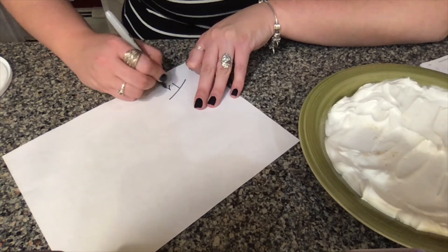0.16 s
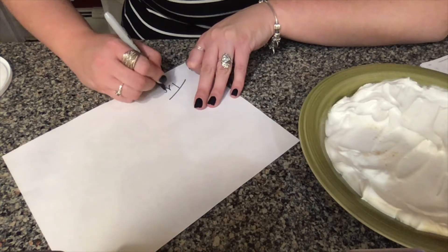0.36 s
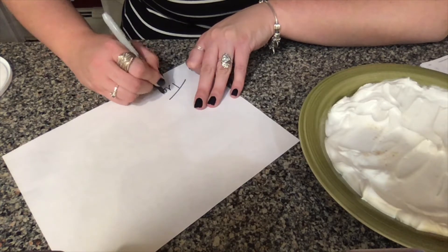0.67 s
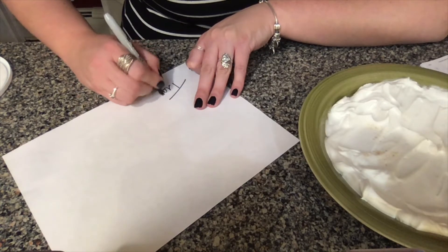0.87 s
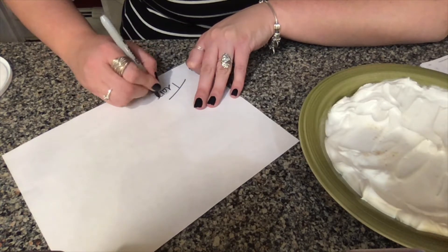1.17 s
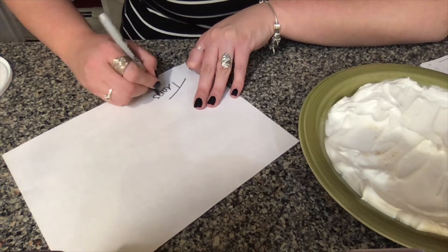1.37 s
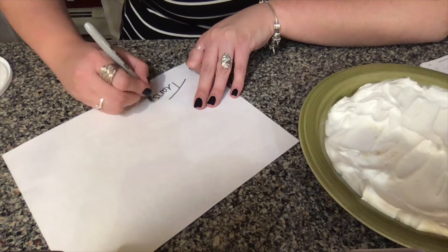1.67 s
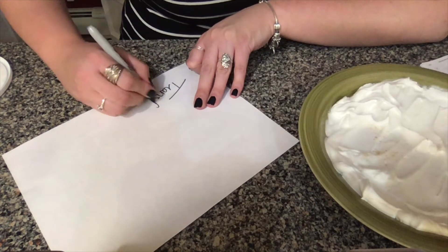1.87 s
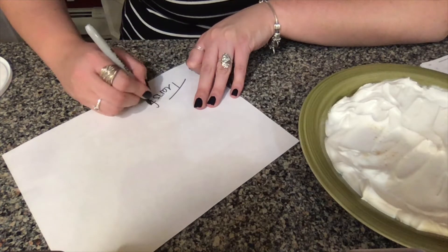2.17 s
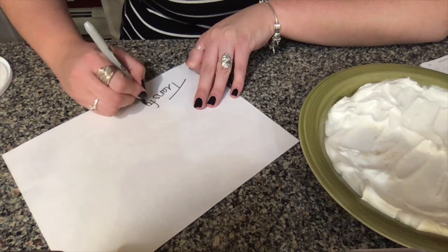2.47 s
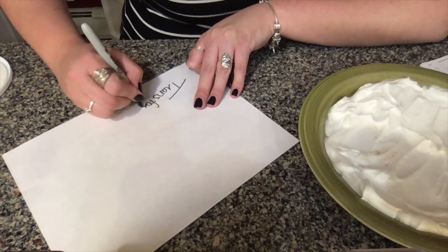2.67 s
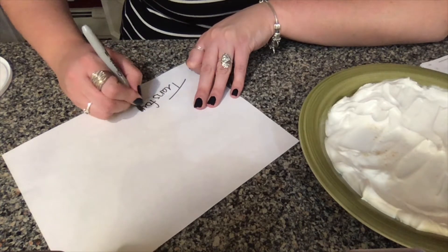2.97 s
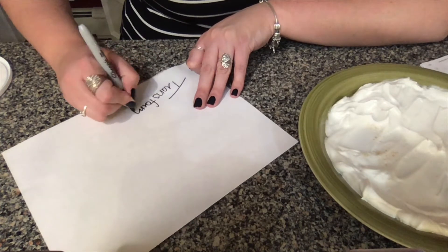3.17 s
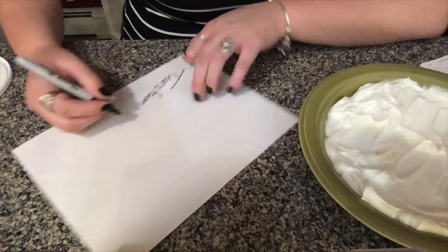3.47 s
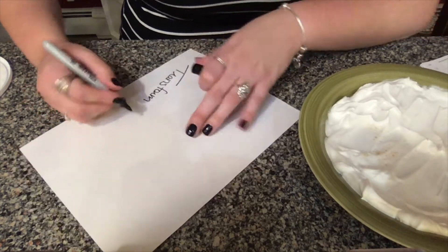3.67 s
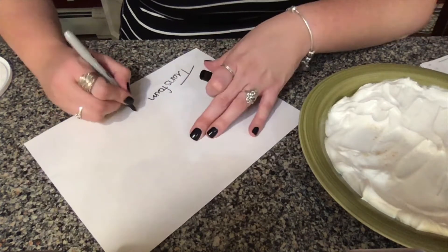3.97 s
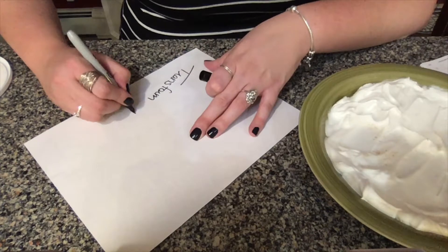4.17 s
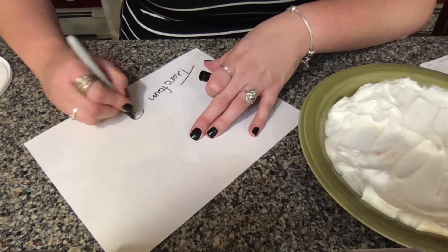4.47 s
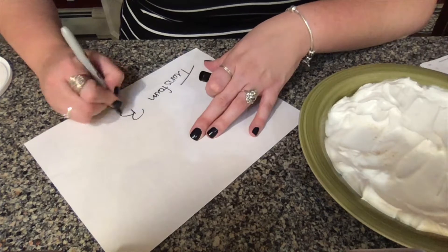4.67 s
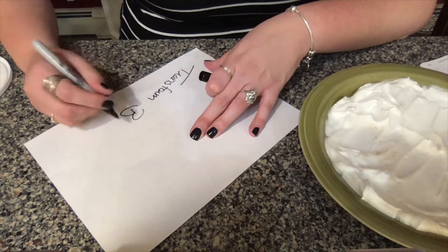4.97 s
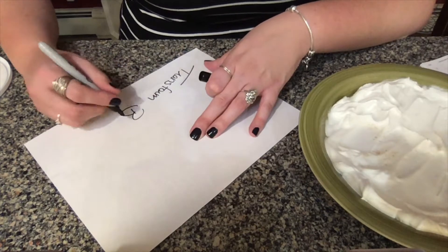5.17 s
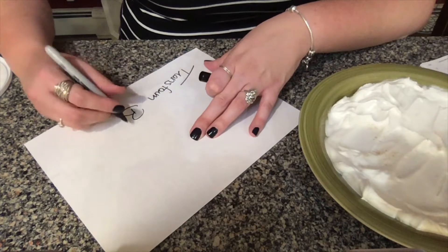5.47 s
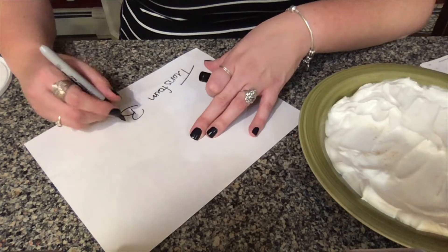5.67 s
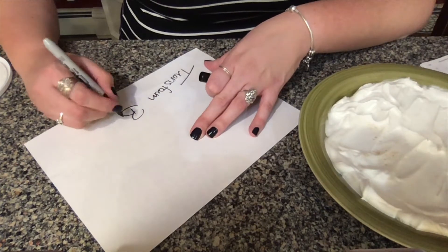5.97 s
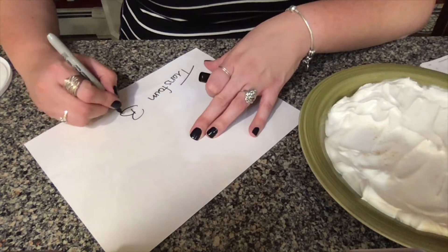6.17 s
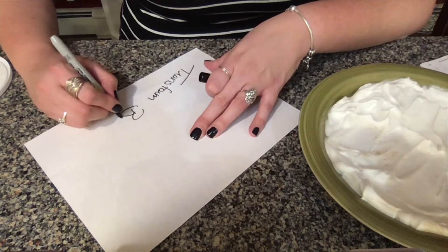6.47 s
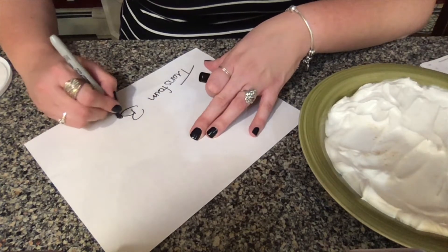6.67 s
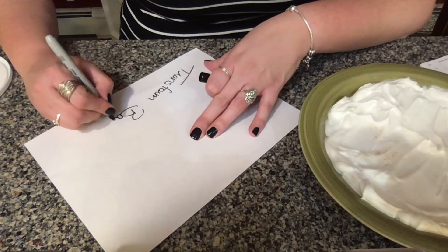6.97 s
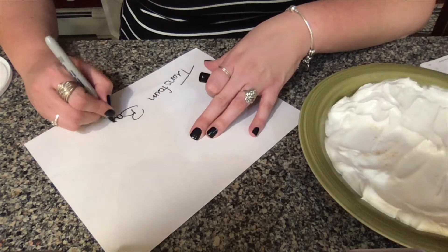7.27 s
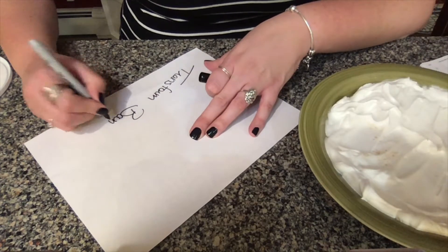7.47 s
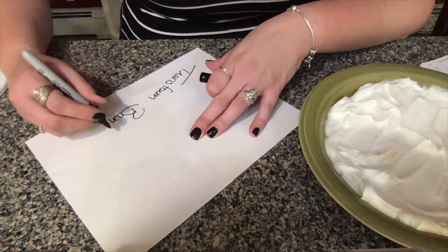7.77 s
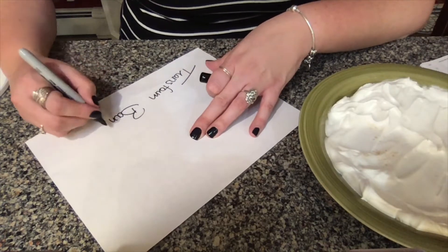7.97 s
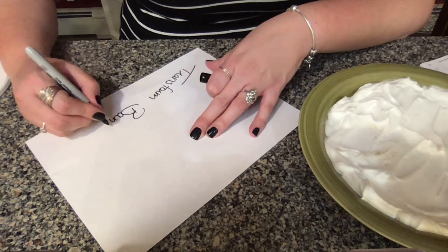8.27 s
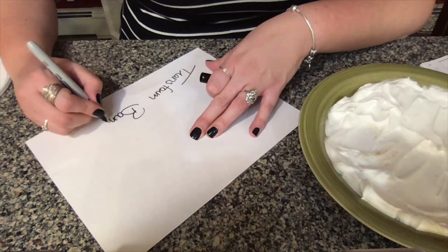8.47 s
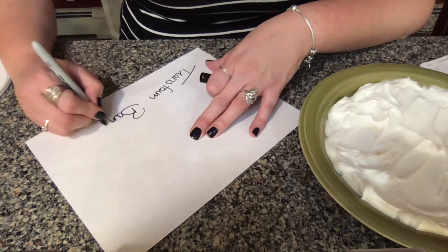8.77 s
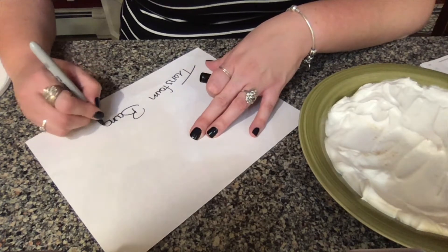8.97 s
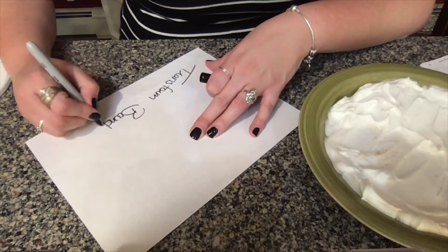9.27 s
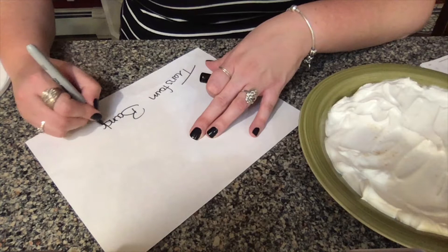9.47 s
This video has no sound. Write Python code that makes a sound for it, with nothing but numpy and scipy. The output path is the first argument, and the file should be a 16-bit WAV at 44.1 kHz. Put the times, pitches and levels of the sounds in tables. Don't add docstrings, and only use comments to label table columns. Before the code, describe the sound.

In a small kitchen, a felt-tip marker writes on paper lying on stone. Quick dry scratches come in clusters, then the sheet slides and is pressed flat with a small knock. Firmer strokes follow, a pause with light ticks, then more gentle writing with gaps. A low refrigerator hum and faint hiss run throughout, caught by a close phone microphone.

```python
import sys
import numpy as np
from scipy import signal
from scipy.fft import rfft, irfft, next_fast_len
from scipy.io import wavfile

SR = 44100
rng = np.random.default_rng(int(sys.argv[2]) if len(sys.argv) > 2 else 0)


def dump_mix(stems):
    frames = np.atleast_2d(stems).T
    limited = np.clip(frames, -1, 1)
    pcm = np.round(limited * 32767).astype(np.int16)
    wavfile.write(sys.argv[1], SR, pcm)


def magnitude_from_level(level_db):
    exponent = np.asarray(level_db, float) / 20
    return 10 ** exponent


N = 424241
STEP = 40


def rms_one(x):
    return x / np.sqrt(np.mean(x ** 2) + 1e-20)


def noise_pair():
    return rng.standard_normal((2, N))


def to_samples(control):
    return np.interp(np.arange(N) / STEP, np.arange(len(control)), control)


def flutter(depth_db, rate_hz):
    r = np.exp(-2 * np.pi * rate_hz * STEP / SR)
    settle = 2000
    slow = signal.lfilter([1], [1, -2 * r, r * r], rng.standard_normal(N // STEP + settle + 2))[settle:]
    return to_samples(magnitude_from_level(depth_db * rms_one(slow)))


def resonate(x, hz, width_hz):
    r = np.exp(-np.pi * width_hz / SR)
    b = np.array([1, 0, -1]) * (1 - r * r) / 2
    return signal.lfilter(b, [1, -2 * r * np.cos(2 * np.pi * hz / SR), r * r], x)


def coloured(sources, spectrum, patchy_db, flicker_hz):
    hz, level_db = np.transpose(spectrum)
    edges = np.geomspace(hz[0], hz[-1], round(4 * np.log2(hz[-1] / hz[0])))
    out = 0
    for k, (low, high) in enumerate(zip(edges, edges[1:])):
        sos = signal.butter(2, [low, high], "band", fs=SR, output="sos")
        band = signal.sosfilt(sos, sources[k % 2])
        band_db = np.interp(np.log(low * high) / 2, np.log(hz), level_db)
        out = out + band * magnitude_from_level(band_db) * flutter(patchy_db, flicker_hz)
    return rms_one(out)


def shaped(x, spectrum):
    size = next_fast_len(N)
    hz, level_db = np.transpose(spectrum)
    bin_hz = np.arange(size // 2 + 1) * SR / size + 1
    gain = magnitude_from_level(np.interp(np.log(bin_hz), np.log(hz), level_db))
    return rms_one(irfft(rfft(x, size) * gain, size)[:N])


def clicks(events, level_db):
    out = np.full(N, 1e-18)
    out[[round(row[0] * SR) for row in events]] = magnitude_from_level(level_db)
    return out


def decay(x, time_s):
    return signal.lfilter([1], [1, -np.exp(-1 / (time_s * SR))], x)


def pushes(rows, extra_db, spread):
    rise_power, fall_power = 2.08, 2.04
    top_s, rise_s, fall_s, level_db = np.array(rows).T[:4, :, None]
    away_s = np.arange(0, N + STEP, STEP) / SR - top_s
    rising = np.abs(away_s / rise_s) ** rise_power
    falling = np.abs(away_s / fall_s / spread) ** fall_power
    away = np.where(away_s < 0, rising, falling)
    power = magnitude_from_level(2 * (level_db + np.reshape(extra_db, (-1, 1)) - 20 * away)).sum(axis=0)
    return to_samples(np.sqrt(power))


# f/Hz, level per Hz/dB
AIR_SPECTRUM = [(180, -9.5), (300, 0), (420, -4.5), (540, -6), (680, -6), (1000, -10), (1500, -15),
                (2100, -21), (2600, -35), (4000, -41), (6300, -43.5), (8200, -41), (11200, -57),
                (14500, -38.5), (15900, -38)]


def air():
    return magnitude_from_level(-56) * flutter(0.3, 1.2) * coloured(noise_pair(), AIR_SPECTRUM, 0.6, 5.0)


# multiple of hum, level re hum/dB
HUM_OVERTONES = [(1.5, -25), (2.0, -29), (4.0, -44)]
# f/Hz, level per Hz/dB
RUMBLE_SPECTRUM = [(15, 5.5), (28, 0), (42, -1.5), (54, -12.5), (70, -4), (100, -6), (150, -15),
                   (200, -22.5), (280, -29.5), (400, -37)]


def fridge():
    hum_hz, hum_db, rumble_db = 119.9, -33.5, -36.5
    motor_hz, motor_width_hz, motor_db = 663, 42, -68
    phase = 2 * np.pi * hum_hz * np.arange(N) / SR
    tone = np.sin(phase)
    for multiple, db in HUM_OVERTONES:
        wander_rad = 0.73 * np.log(flutter(3.9, 4.0))
        tone = tone + magnitude_from_level(db) * flutter(2.7, 7.7) * np.sin(multiple * phase + wander_rad)
    hum = np.sqrt(2) * magnitude_from_level(hum_db) * flutter(0.75, 5.3) * tone
    white = noise_pair()
    drone = resonate(resonate(white[0], motor_hz, motor_width_hz), motor_hz, motor_width_hz)
    rumble = coloured(white, RUMBLE_SPECTRUM, 1.0, 0.53)
    return hum + magnitude_from_level(rumble_db) * rumble + magnitude_from_level(motor_db) * rms_one(drone)


def kitchen(x):
    t60_s, wall_cut_hz = 0.45, 6000
    size = next_fast_len(N + SR)
    z = np.exp(-2j * np.pi * np.arange(size // 2 + 1) / size)
    dull = np.exp(-2 * np.pi * wall_cut_hz / SR)
    wall = (1 - dull) / (1 - dull * z)
    echo = 0
    for k, lag in enumerate((rng.uniform(0.008, 0.03, 10) * SR).astype(int)):
        loop = magnitude_from_level(-60 * lag / SR / t60_s) * wall * np.exp(lag * np.log(z))
        echo = echo + (-1) ** k * loop / (1 - loop)
    return irfft(rfft(x, size) * echo, size)[:N]


# t of top speed/s, rise/s, fall/s, level/dB
HAND_DRAGS = [
    (.55, .2, 0.4, -60),
    (2.3, 0.051, 0.19, -60),
    (3.46, 0.088, 0.11, -58.5),
    (3.79, 0.087, 0.086, -60),
    (5.47, 0.04, 0.086, -52.5),
]
# f/Hz, level per Hz/dB
SKIN_SPECTRUM = [(450, -9), (700, 4), (1100, 2), (1500, -15.5), (2300, -13.5)]


def hand():
    return pushes(HAND_DRAGS, 0, 1) * coloured(noise_pair(), SKIN_SPECTRUM, 2.0, 12.0)


# t/s, peak level/dB, brightness/dB
SMALL_KNOCKS = [(1.0126, -55, -19), (2.2464, -57.5, 0), (3.7464, -50.5, -17), (3.7808, -45, -8),
                (6.6508, -53, -10), (7.251, -51, -18), (8.8253, -48, -10), (3.0655, -40, -16),
                (4.5955, -46, -26), (5.997, -49, -12), (6.0088, -37.5, -15), (6.1085, -45, -22)]
# f/Hz, width/Hz, level/dB
KNOCK_MODES = [(1400, 260, -5), (1750, 260, -7), (2200, 300, -12), (3000, 400, -17), (4100, 500, -25),
               (5400, 300, -33), (7800, 600, -29), (9100, 600, -30)]


def ticks():
    _, peak_db, bright_db = np.array(SMALL_KNOCKS).T
    scuff = rng.standard_normal(N)
    out = np.zeros(N)
    for hz, width_hz, db in KNOCK_MODES:
        knock = clicks(SMALL_KNOCKS, peak_db + db + (bright_db + 18) * (hz > 4500))
        burst = knock * SR / (np.pi * width_hz) + magnitude_from_level(19.5) * scuff * decay(knock, 0.0019)
        ring = resonate(burst, hz, width_hz)
        ring = resonate(ring, hz, 2 * width_hz)
        out += resonate(ring, hz, 2 * width_hz)
    return out


def fibre_slips():
    slips_per_s = 14000
    hits = rng.random((2, N)) < slips_per_s / SR
    size = magnitude_from_level(1.49 * rng.exponential(1, (2, N)))
    slips = hits * size * rng.choice([-1, 1], (2, N))
    return slips + 0.99 * noise_pair()


def sheet(slips):
    out = 0
    for k, hz in enumerate(np.linspace(1500, 16500, 76)):
        out = out + flutter(3.1, 7.0) * resonate(slips[k % 2], hz, 190) * (-1) ** (k // 2)
    return out


# f/Hz, level per Hz/dB
SHEET_SPECTRUM = [(4000, -37.5), (5200, -14), (5800, -6.5), (6400, -5), (7400, -3), (8300, 0), (9300, -5.5),
                  (10200, -8), (10900, -18), (11800, -34.5)]
# f/Hz, level per Hz/dB
FIBRE_SPECTRUM = [(10000, -50), (11000, -24), (12000, -13.5), (13000, -8.5), (14000, -4), (14700, -3.5),
                  (15300, -8.5), (15750, -1.5), (16000, -39)]
# f/Hz, level per Hz/dB
COUNTER_SPECTRUM = [(1700, -31), (2100, -2), (2700, -0.5), (3200, 3.5), (3700, 2), (4500, 0.5),
                    (5200, -2.5), (6200, -36)]


def paper_noises(slips):
    paper = sheet(slips)
    return [shaped(paper, spectrum) for spectrum in (SHEET_SPECTRUM, FIBRE_SPECTRUM, COUNTER_SPECTRUM)]


# f/Hz, width/Hz, level/dB
TIP_RINGS = [(3684, 54, -2.5), (4400, 350, -4), (7240, 200, -5.5), (8130, 36, -16.5), (8690, 27, -12.5),
             (14600, 300, -6), (15300, 300, -6)]


def tip_rings(hiss):
    return sum(magnitude_from_level(db) * flutter(1.1, 13.0) * resonate(hiss, hz, width_hz) for hz, width_hz, db in TIP_RINGS)


# f/Hz, width/Hz, level/dB
BARREL_MODES = [(1462, 350, -0.5), (1628, 180, 1), (1748, 140, -4)]


def barrel(slips):
    out = 0
    for hz, width_hz, db in BARREL_MODES:
        ring = resonate(resonate(slips[0], hz, width_hz), hz, width_hz)
        out = out + magnitude_from_level(db) * flutter(1.8, 9.0) * ring
    return rms_one(out)


# t of top/s, rise/s, fall/s, level/dB
TURN_DIGS = [(.3, .01, 0.056, -64), (.89, .01, 0.041, -70), (1.325, .015, 0.057, -55),
             (4.556, .02, .03, -60), (4.598, 0.0066, 0.06, -57), (4.72, .03, 0.11, -63),
             (6.6, .06, 0.18, -66), (6.95, 0.12, 0.18, -67), (8.83, .015, .06, -64.5),
             (9.09, 0.032, 0.05, -63), (9.385, 0.011, .08, -67)]


def barrel_pressure(rows, effort_db, lean_db):
    base_db, effort_lag, lean_share, spread = -1.5, 0.65, 1.3, 1.2
    push_db = base_db - effort_lag * effort_db + lean_share * lean_db
    return pushes(rows, push_db, spread) + pushes(TURN_DIGS, 0, 0.75)


# t/s, peak level/dB
TIP_TOUCHES = [(0.2721, -60), (0.8235, -67), (0.856, -59), (1.1453, -64), (2.0596, -60), (2.8975, -65.5),
               (3.0689, -55.5), (3.761, -50), (3.782, -42), (3.796, -43), (4.384, -53), (4.589, -63),
               (6.441, -44.5), (6.4628, -55), (7.1846, -67.5), (7.251, -52), (8.7889, -47), (9.3367, -55)]


def landings(body, top):
    touches = clicks(TIP_TOUCHES, np.array(TIP_TOUCHES)[:, 1] - 15)
    return decay(touches, 0.0058) * (body + magnitude_from_level(-9.0) * top)


# t of top speed/s, rise/s, fall/s, rubbing level/dB, fibre hiss re rubbing/dB
FIRST_PUSHES = [(0.017, 0.026, 0.063, -59.7, -17), (0.047, 0.069, 0.06, -63, 4),
                (0.136, 0.043, 0.072, -67.5, -3), (0.181, 0.011, 0.064, -72.0, 7),
                (0.279, 0.0093, 0.44, -73, 7.5), (0.346, 0.019, 0.073, -67.5, -7),
                (0.477, 0.084, 0.031, -62, -2.3), (0.547, 0.057, 0.14, -74.5, 2),
                (0.756, 0.054, 0.048, -71.1, 2.4), (0.827, 0.0077, 0.2, -70.5, 5),
                (0.931, 0.1, 0.068, -63, 3), (1.055, 0.15, 0.023, -81, 9), (1.151, 0.019, 0.06, -72.5, 8),
                (1.234, 0.037, 0.11, -68.5, 5.0), (1.321, 0.03, 0.078, -54.5, 0.5),
                (1.415, 0.031, 0.11, -75, 6)]
NEXT_PUSHES = [(1.798, 0.032, 0.13, -69, -0.8), (1.884, 0.077, 0.07, -62, -2), (1.964, 0.01, 0.067, -74, 8),
               (2.093, 0.042, 0.053, -65, 2), (2.193, 0.018, 0.468, -70, -1.3),
               (2.308, 0.07, 0.16, -57.0, -1.5), (2.533, 0.257, 0.03, -67.5, 0),
               (2.662, 0.17, 0.043, -71.5, 4), (2.82, 0.05, 0.052, -76, 2), (2.901, 0.016, 0.12, -63.5, -1),
               (2.994, 0.03, 0.056, -64.5, 1), (3.076, 0.019, 0.15, -58.0, -3.3),
               (3.146, 0.018, 0.083, -61, -2)]
SHEET_SLIDE = [
    (3.316, 0.36, 0.23, -73, -1.7),
    (3.435, 0.06, 0.18, -58.5, 6.5),
    (3.716, 0.062, 0.73, -80, 3),
    (3.777, 0.0051, 0.11, -72.5, 5),
]
CAPITAL_PUSHES = [
    (4.19, 0.017, 0.12, -70.5, 0.1),
    (4.271, 0.006, 0.34, -85, 10),
    (4.383, 0.0074, 0.6, -67, 4),
    (4.459, 0.08, 0.025, -62, 6),
    (4.544, 0.085, 0.03, -58, 1),
    (4.59, 0.0049, 0.11, -59, 2.5),
    (4.727, 0.06, 0.084, -51.5, 7),
    (4.815, 0.06, 0.29, -78.5, 0.5),
    (5.339, 0.038, 0.024, -81.5, 8),
]
LAST_PUSHES = [(6.438, 0.005, 0.057, -79, 9), (6.517, 0.015, 0.19, -68.2, 0), (6.622, 0.057, 0.071, -80, 6),
               (6.658, 0.17, 0.08, -62, 2), (6.894, 0.059, 0.27, -70, -4), (6.979, 0.052, 0.079, -60.5, 2),
               (7.182, 0.04, 0.05, -71, 0.5), (7.253, 0.012, 0.2, -67, 0),
               (7.347, 0.031, 0.064, -65.5, 0.5), (8.787, 0.012, 0.07, -65.5, 3),
               (8.833, 0.025, 0.11, -63, -1), (8.919, 0.056, 0.12, -62, 1), (9.052, 0.184, 0.039, -78, -5),
               (9.127, 0.094, 0.087, -69.2, -2.3), (9.337, 0.015, 0.042, -75, 8),
               (9.42, 0.081, 0.09, -67, -1.9), (9.515, 0.066, 0.085, -64, 1), (9.616, 0.022, 0.02, -68, -3)]
LIGHT_GRAZES = [
    (1.57, 0.042, 0.067, -86, 6),
    (1.65, .03, 0.043, -92, 6),
    (5.2, 0.18, 0.13, -84.5, 1),
    (5.7, 0.018, .04, -86, 2),
    (6.015, 0.025, .12, -80, -11),
    (7.73, 0.073, .12, -103, 20),
]
# t/s, level/dB
PEN_LEAN = [(0, -5), (.3, 1.5), (.9, 1), (1.3, -0.5), (1.9, -0.5), (2.3, 2.5), (3.1, -0.5), (3.44, -4.5),
            (3.8, 7), (4.45, -2.5), (4.62, 1), (4.75, -1), (6.45, 3), (6.6, 1), (7.3, 0.5), (8.79, -5),
            (8.9, 1.5), (9.62, 0)]


def marker():
    usual_rub_db = -65
    rows = np.vstack([FIRST_PUSHES, NEXT_PUSHES, SHEET_SLIDE, CAPITAL_PUSHES, LAST_PUSHES])
    light = np.vstack([rows, LIGHT_GRAZES])
    effort_db, bright_db = rows[:, 3] - usual_rub_db, rows[:, 4]
    lean_db = np.interp(rows[:, 0], *np.transpose(PEN_LEAN))

    rub = pushes(light, 0, 0.93)
    fibres = pushes(light, light[:, 4], 0.8)
    weight = pushes(rows, -5 - 0.46 * effort_db - 0.51 * bright_db + lean_db, 1.17)
    pressure = barrel_pressure(rows, effort_db, lean_db)

    slips = fibre_slips()
    body, top, counter = paper_noises(slips)
    hiss = magnitude_from_level(-0.85) * rub * body + magnitude_from_level(-3.3) * fibres * top + weight * counter
    tremble = flutter(1.8, 40)
    rubbing = tremble * (hiss + tip_rings(hiss) + pressure * barrel(slips))
    return rubbing + landings(body, top)


def scene():
    hands = marker() + hand() + ticks()
    return (hands + magnitude_from_level(-21) * kitchen(hands) + fridge() + air())[None]


def band_limit(x):
    return signal.sosfilt(signal.butter(12, 17040, fs=SR, output="sos"), x)


def record(dry):
    cut_hz = 15690
    cut = signal.sosfilt(signal.ellip(12, 0.5, 80, cut_hz, fs=SR, output="sos"), dry)
    return band_limit(cut)


dry = scene()
out = record(dry)
dump_mix(out)
```